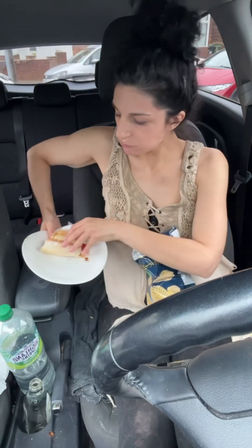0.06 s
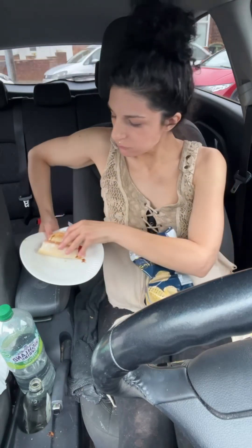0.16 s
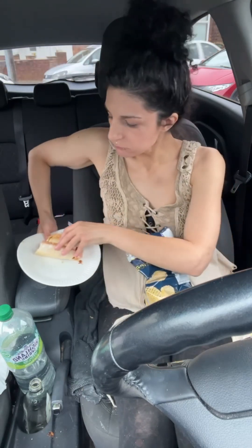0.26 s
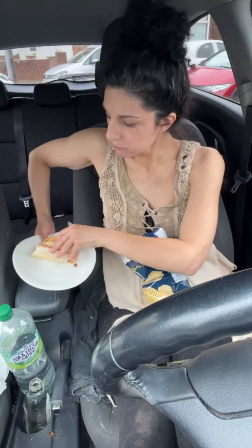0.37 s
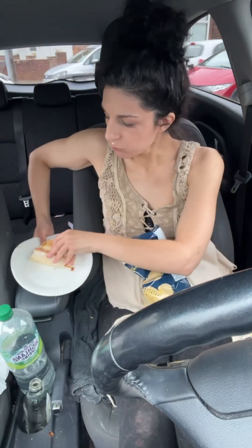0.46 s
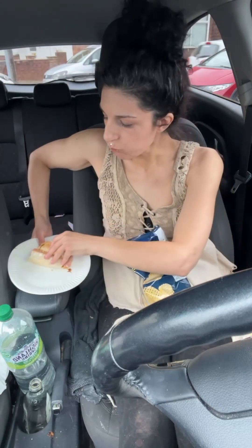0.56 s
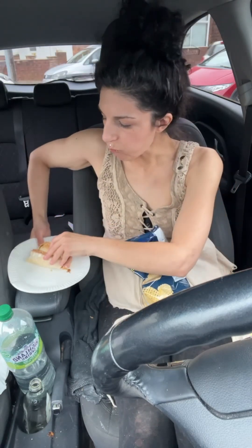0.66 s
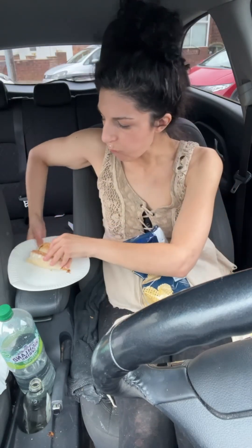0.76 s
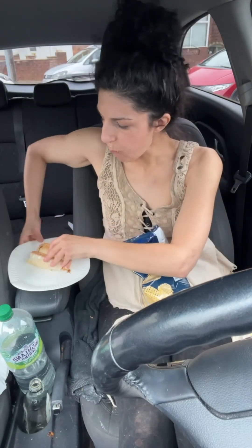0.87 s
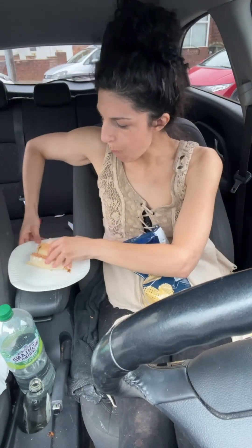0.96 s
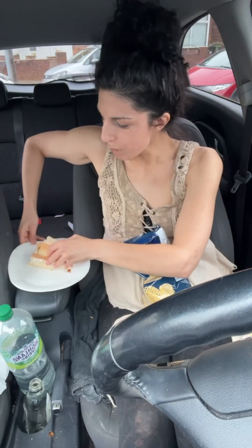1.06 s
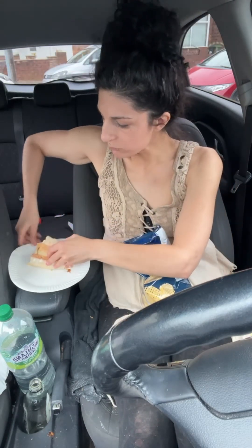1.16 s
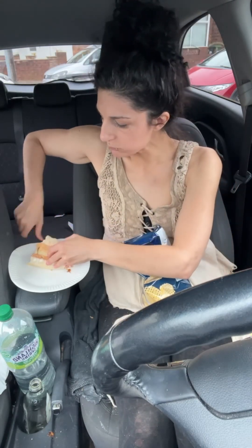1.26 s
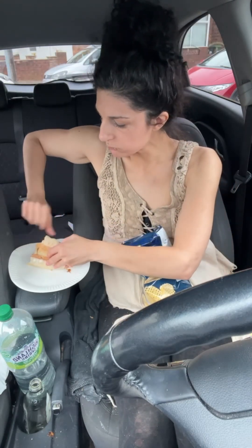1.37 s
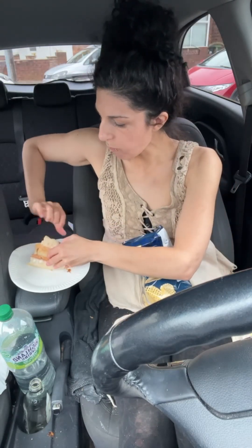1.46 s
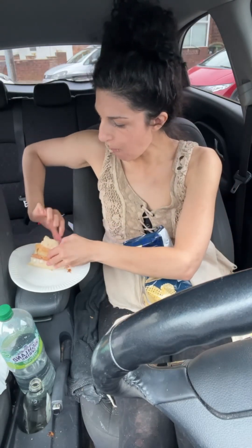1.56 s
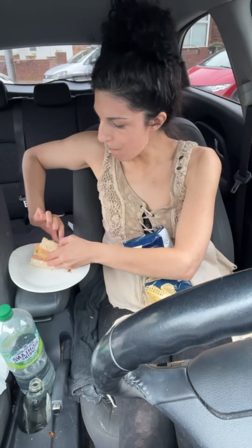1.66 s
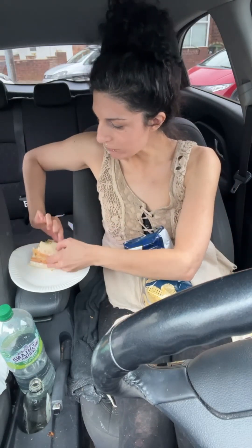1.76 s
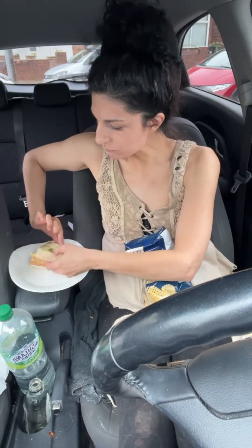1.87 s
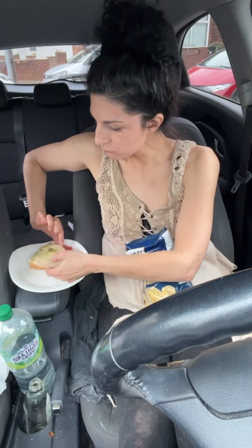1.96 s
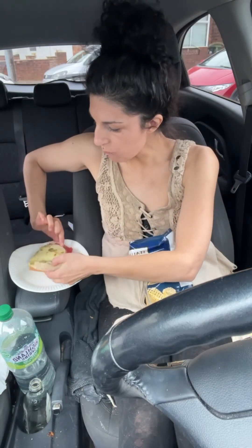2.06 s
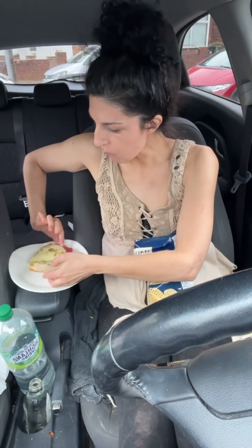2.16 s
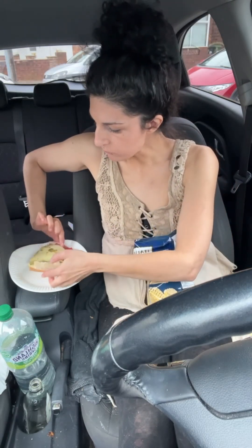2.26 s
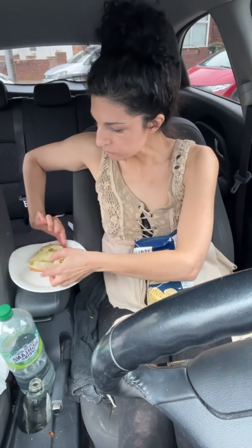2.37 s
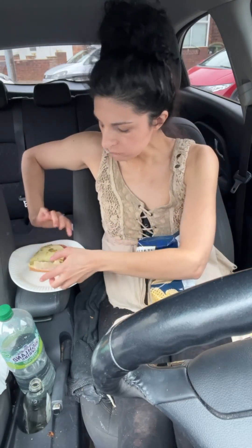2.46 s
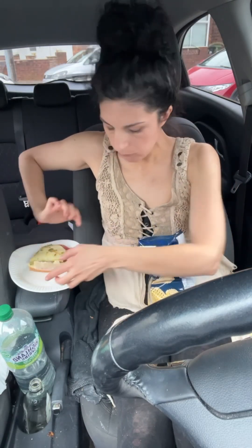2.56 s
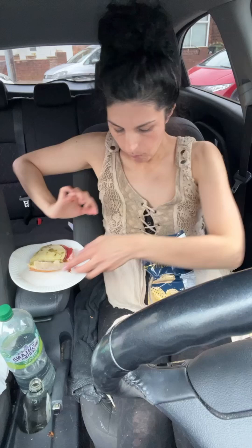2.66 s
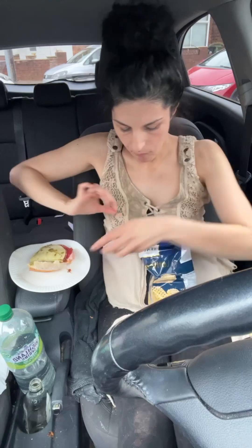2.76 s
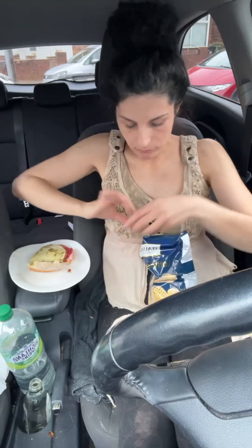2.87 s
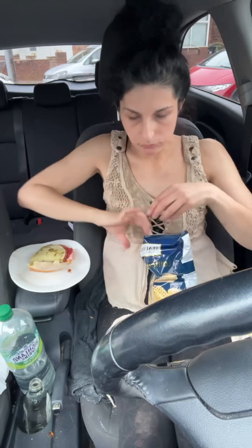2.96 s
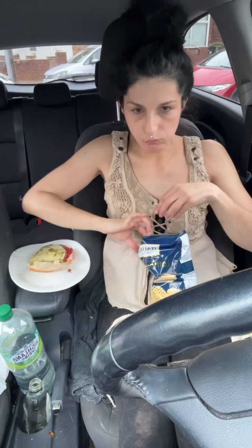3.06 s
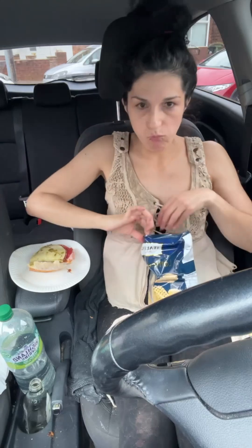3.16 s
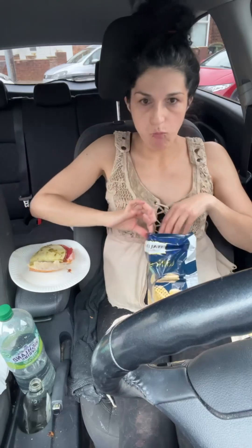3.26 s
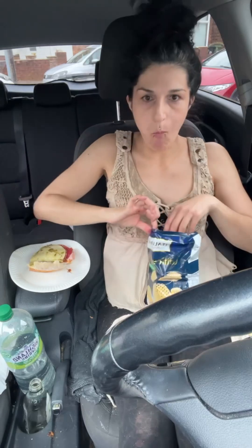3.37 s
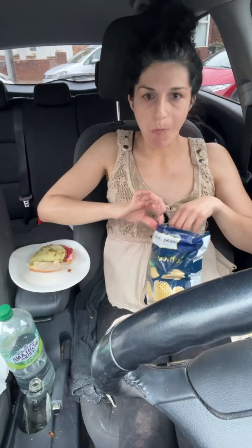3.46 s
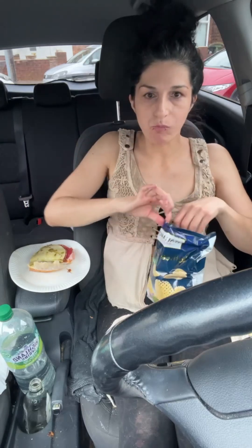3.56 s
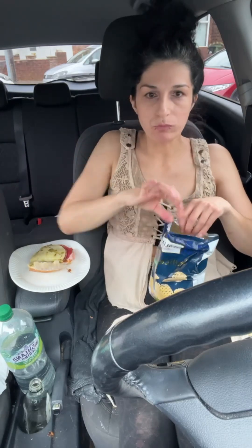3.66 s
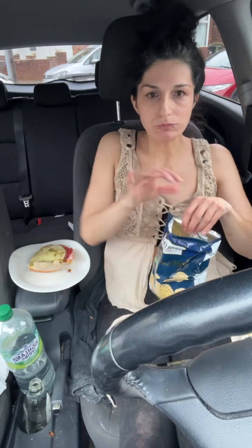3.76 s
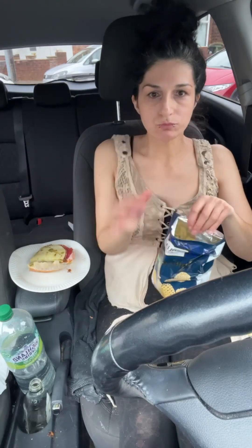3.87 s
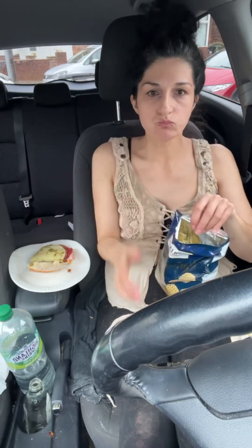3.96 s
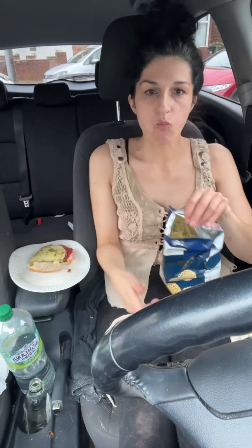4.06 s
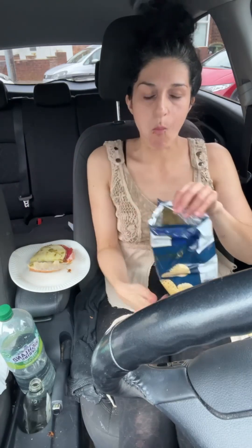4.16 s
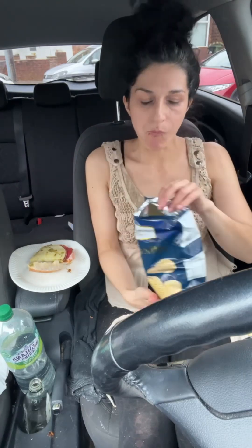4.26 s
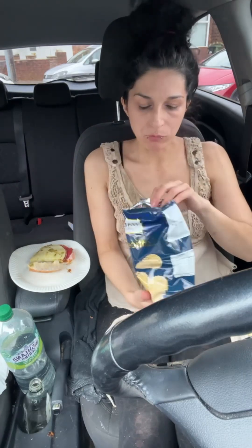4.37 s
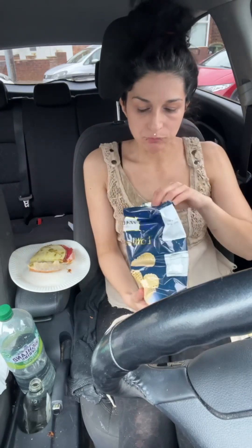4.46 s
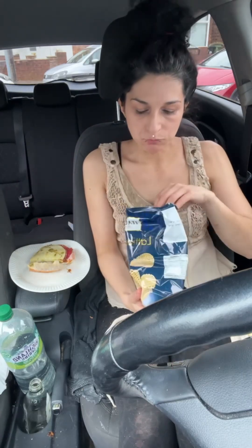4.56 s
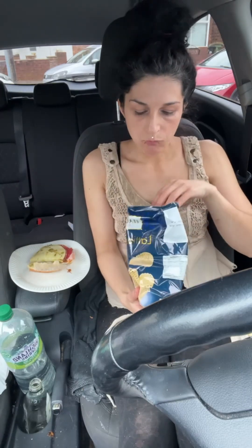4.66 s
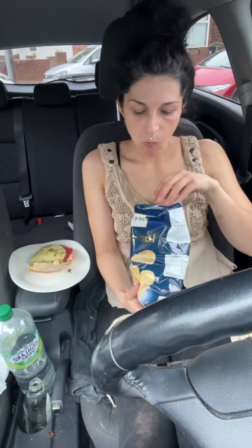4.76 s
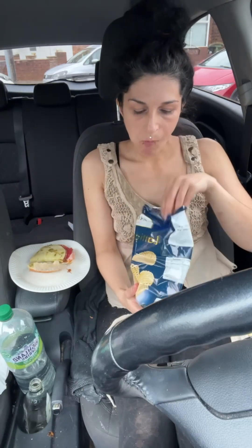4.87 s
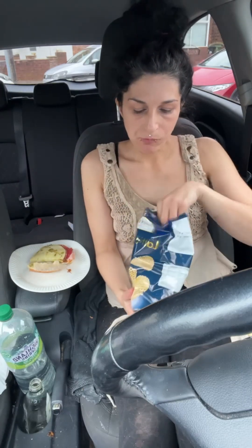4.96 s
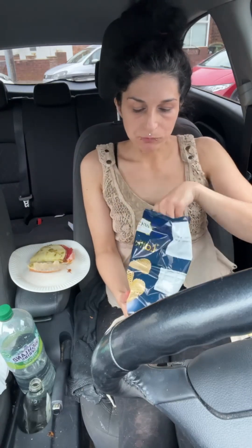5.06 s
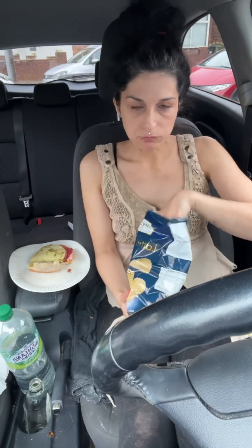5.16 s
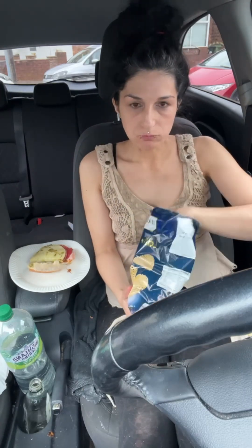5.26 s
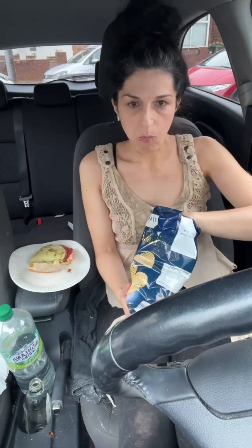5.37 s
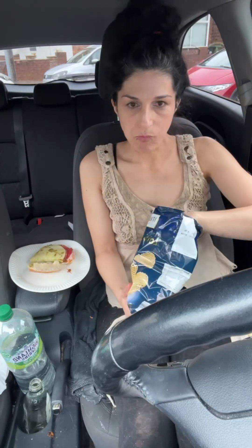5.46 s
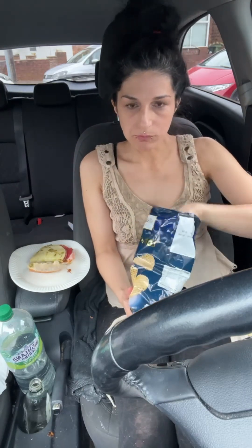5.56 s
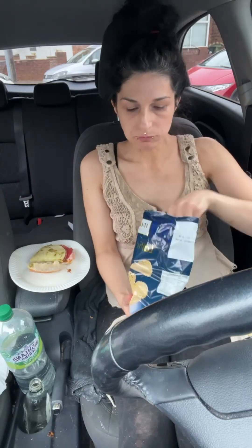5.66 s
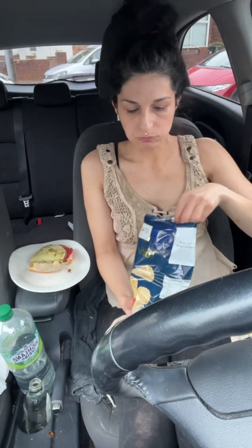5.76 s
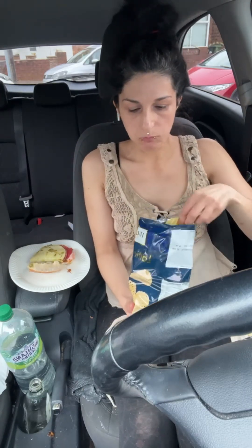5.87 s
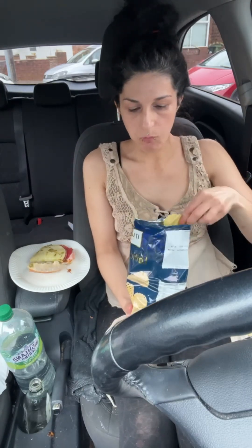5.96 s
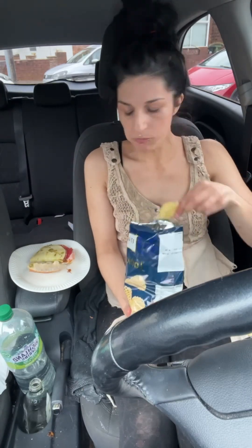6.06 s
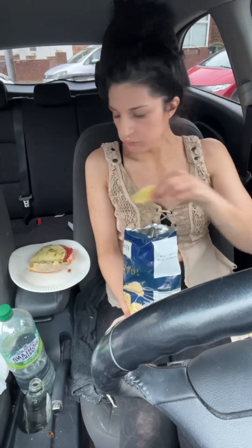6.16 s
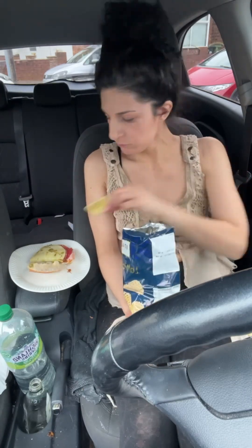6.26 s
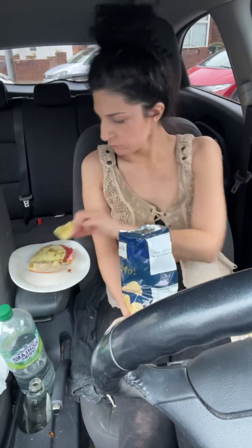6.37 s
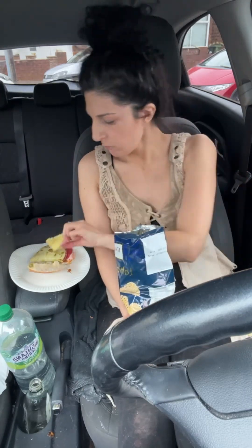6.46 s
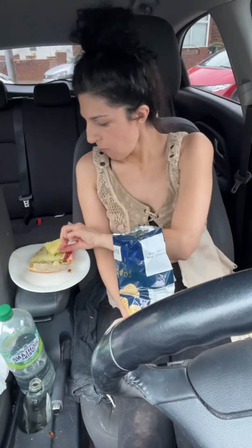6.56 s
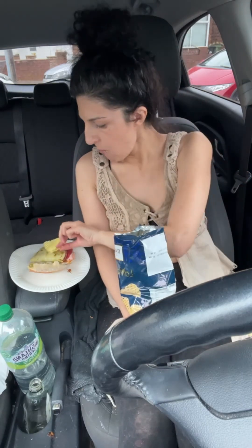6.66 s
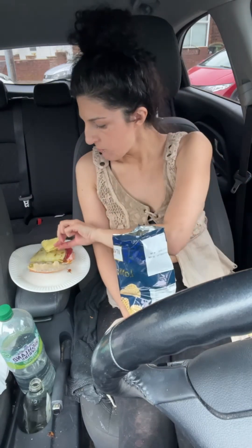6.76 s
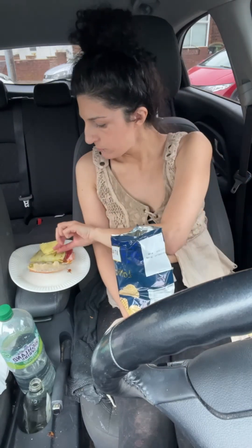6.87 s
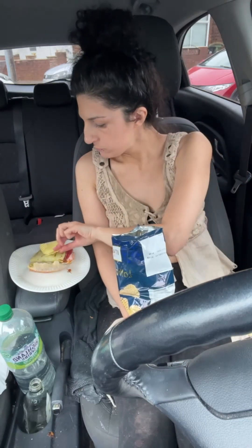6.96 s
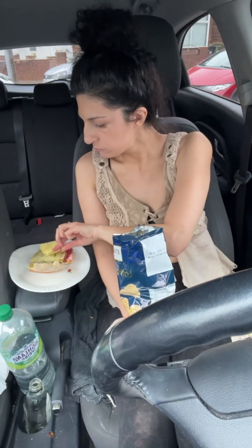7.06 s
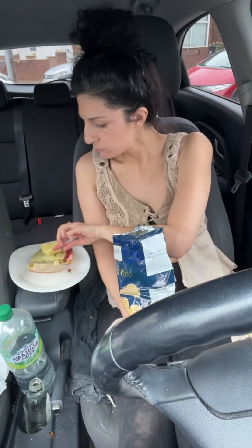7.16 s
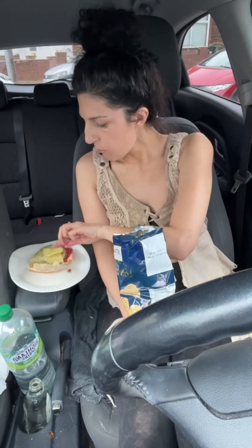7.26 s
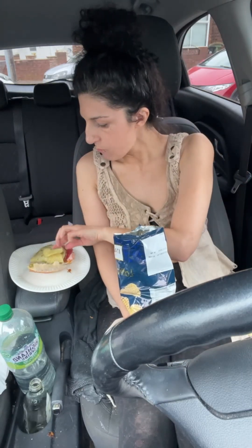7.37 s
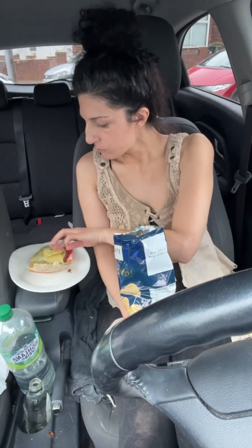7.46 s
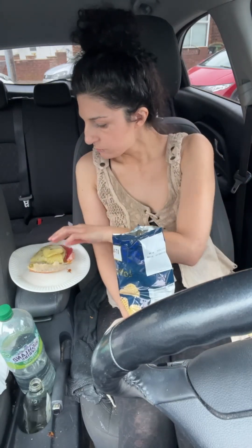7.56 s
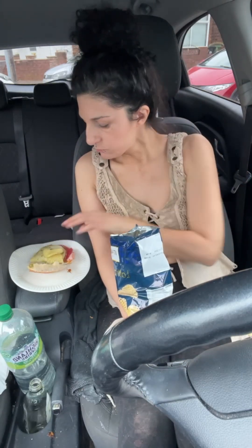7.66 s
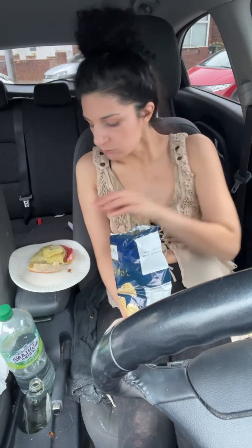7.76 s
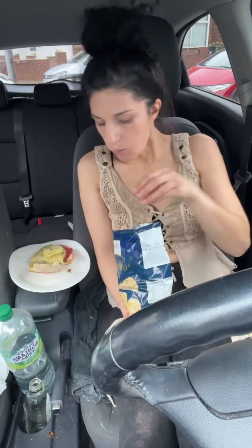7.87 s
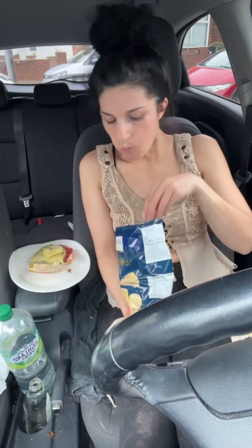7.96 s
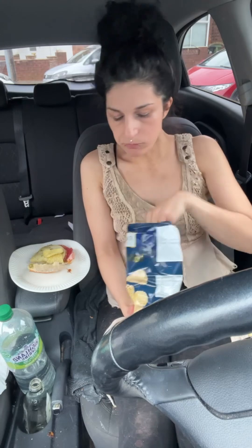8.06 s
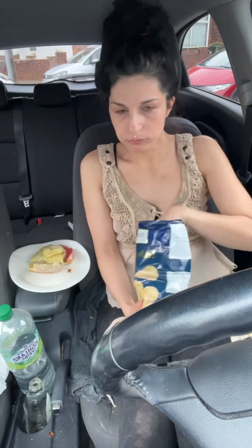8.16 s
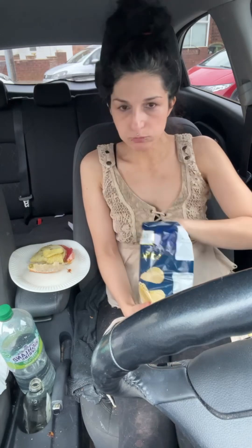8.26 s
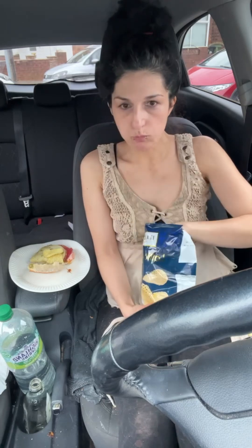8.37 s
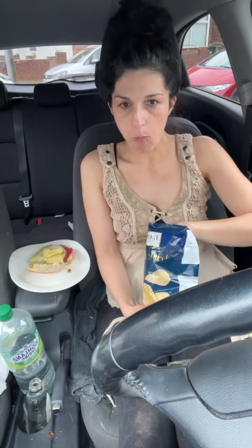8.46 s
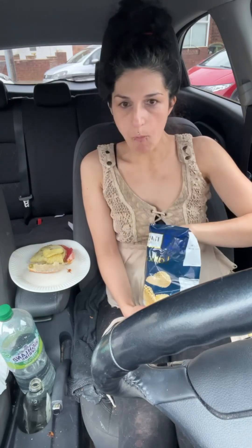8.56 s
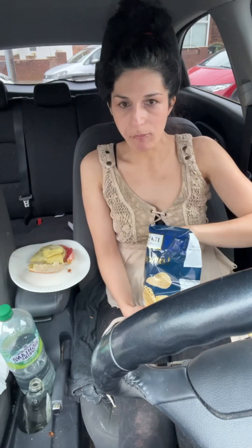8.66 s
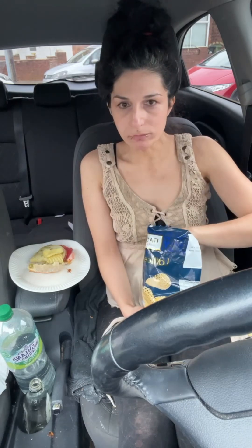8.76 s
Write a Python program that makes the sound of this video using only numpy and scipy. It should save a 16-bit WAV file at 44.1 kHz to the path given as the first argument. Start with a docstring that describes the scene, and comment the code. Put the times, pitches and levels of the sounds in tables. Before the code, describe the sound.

Inside a closed parked car, a thin foil snack packet is touched lightly: a few crisp snaps and skin sliding on film over low traffic rumble. After a short lull, dense crackling, sharp snaps and soft thuds build, loudest past five seconds, then thin out. Faint ticks follow, almost quiet, before a final brisk crackle. Close phone microphone, dry cabin with very short echoes.

```python
"""A hand works a thin foil snack packet inside a parked car, with far traffic rumbling and fading low down.
First come a few clear snaps of creases, then skin sliding over the film, more snaps and a short lull.
From about 3.2 s dense crackle, snaps and soft thuds build up, strongest after 5 s, and thin out past 6 s.
A few faint ticks follow, then a last lively burst from about 8.1 s. Filtered noise makes the rustle and the
traffic, ringing tones make the knocks, and the bag puffs low air; the small padded cabin adds short echoes."""
import sys
import numpy as np
from scipy import signal
from scipy.io import wavfile
from scipy.ndimage import uniform_filter1d

SR = 44100
rng = np.random.default_rng(int(sys.argv[2]) if len(sys.argv) > 2 else 0)


def waveform_to_disk(signal):
    """Save audio, clipped to [-1, 1], as 16-bit WAV at the path in sys.argv[1]."""
    frames = np.transpose(np.atleast_2d(signal))
    scaled = np.clip(frames, -1, 1) * 32767
    samples = np.round(scaled).astype(np.int16)
    wavfile.write(sys.argv[1], SR, samples)


def magnitude_from_level(level_db):
    """Linear magnitude for a level in decibels (20 dB per decade)."""
    exponent = np.asarray(level_db, float) / 20
    return 10 ** exponent


N = 389403

# hiss of the still air in the closed car: pitch_hz, density_db (per Hz, shape only)
STILL_AIR = [(180, -25), (300, -7), (433, -5), (4230, -13), (14500, -31), (16000, -45)]
STILL_AIR_DB = -68
# colour of the wash from the street: pitch_hz, density_db (per Hz, shape only)
STREET_COLOUR = [(47, -44), (80, 2), (206, -3), (290, -6.5), (425, -17), (700, -21), (1100, -68.5)]
# the low sound of traffic over time: time_s, drone_db, wash_db
TRAFFIC = [(0, -49, -51.5), (.5, -51.5, -56), (.62, -49.5, -53), (1.2, -45.5, -60), (1.55, -49, -55),
           (1.65, -56.5, -56.5), (2.2, -51, -57.5), (2.5, -56.5, -58), (6, -63.5, -61.5),
           (8.83, -60.5, -65)]
# how fast echoes die in the cabin: pitch_hz, fall_by_60_db_s
CABIN_DECAY = [(300, 0.2), (800, 0.059), (2000, 0.071), (5500, 0.047), (14000, 0.073)]
# soft thuds of hand, bag and plate: start_s, peak_db, pitch_hz
SOFT_THUDS = [(0.137, -34.5, 415), (0.142, -36.5, 202), (0.633, -35.5, 150), (2.696, -40.5, 74),
              (3.253, -39, 327), (3.482, -32, 253), (3.63, -31.5, 292), (3.799, -39, 259),
              (5.104, -29, 104), (5.322, -38.5, 204), (5.439, -33.5, 102), (5.763, -32, 222),
              (8.466, -34, 243), (8.55, -32.5, 261.7)]
# the packet resting in lap or hand between strokes: time_s, rustle_db
RESTING_LEVEL = [(0, -65.5), (1.3, -69.5), (1.6, -79), (2.6, -71), (2.8, -86), (3.16, -94), (3.3, -52),
                 (4.3, -64), (5.25, -56), (6.15, -66), (6.25, -80), (6.45, -72), (6.95, -72), (7.2, -109.5),
                 (8.1, -79), (8.7, -51)]
# single strokes and squeezes of hand or arm on the film:
# start_s, length_s, rustle_db, change_db (from start to end)
HAND_STROKES = [(0.115, 0.18, -63.5, 4.5), (0.544, 0.1, -64.5, 10.5), (0.658, 0.052, -59.5, 1.5),
                (0.821, 0.21, -51.5, 10), (1.087, 0.2, -47.5, -5), (1.767, 0.094, -58.5, 6),
                (1.947, 0.35, -63, -1.5), (2.487, 0.087, -53, -1), (3.235, 0.04, -44, 4),
                (3.391, 0.029, -42.5, 2), (3.414, 0.24, -44, 0), (3.757, 0.031, -37.5, 5.5),
                (3.83, 0.039, -54.5, 6), (3.98, 0.19, -50.5, 7.5), (4.443, 0.015, -35, -9),
                (4.502, 0.14, -47, 4), (4.675, 0.39, -42, -11), (5.026, 0.18, -35, -5),
                (5.306, 0.084, -37, 12), (5.423, 0.25, -37, -12), (5.675, 0.11, -49, 11),
                (5.795, 0.19, -38, -8), (5.99, .17, -55, -3), (2.974, 0.027, -67, 0.5),
                (7.345, 0.012, -71.5, 10), (7.921, 0.12, -67, -2.5), (8.162, 0.26, -42.5, 1),
                (8.341, 0.025, -33.5, 4), (8.39, 0.084, -40.5, 0), (8.492, 0.074, -38.5, 0.5),
                (8.758, 0.13, -51, 0)]
RISE_DB_PER_S, FALL_DB_PER_S = 550, 449.5  # every stroke swells in and dies away alike
# manner of touch: time_s, slide_share (0 all crackle, 1 all smooth sliding), hollow_db (against the rustle)
TOUCH_MANNER = [(0, 0.08, 2), (.8, 0.6, -4.5), (1.3, 0.54, -19), (1.5, 0.43, -6), (2.55, 0.46, -7),
                (3.3, 0.09, -7), (5.9, 0.18, -7.5), (6.4, 0.21, 6.5), (8.05, 0.04, -8)]
# colour of sliding skin against crackle: pitch_hz, level_db
SKIN_COLOUR = [(1750, 0), (2170, -4.5), (2760, 11), (3270, -5), (3800, 0)]
# colour of the film's own sound: pitch_hz, density_db (per Hz, shape only)
FILM_COLOUR = [(760, -15), (1300, -4), (1940, -8.5), (2950, -3), (7000, 1.5), (9000, -0.5), (11200, -11.5),
               (15800, -14.5)]
# ringing modes of bag and dashboard: pitch_hz, width_hz, level_db
HOLLOW_MODES = [(615, 1700, -18), (780, 60, -16), (1000, 61, 12.5), (1120, 85, 6.5), (1433, 79, 0)]
# clear snaps of a crease: start_s, peak_db, pitch_hz (of the film patch), knock_db (hollow knock against the peak)
CREASE_SNAPS = [(0.0365, -25, 7360, -43), (0.1201, -28.5, 8700, -10), (0.1317, -28.5, 1940, -19),
                (0.628, -36.5, 2790, -3), (1.0171, -42, 1840, -37), (1.1287, -43.5, 2700, 4),
                (1.4053, -40.5, 2760, -0.5), (1.5144, -31, 3350, -9), (1.928, -24, 8400, -21),
                (2.029, -41.5, 8200, -25), (2.1695, -28.5, 2540, -18), (2.1878, -33.5, 1540, -11),
                (2.272, -40, 2500, -9), (2.614, -38, 7160, -10), (2.6471, -33.5, 2590, -10),
                (2.7286, -32, 2600, -5), (3.2411, -21.5, 5760, -21), (3.259, -19.5, 3120, -37),
                (3.3355, -13, 2350, -25), (3.3898, -32, 3830, -10), (3.4035, -24, 2600, -7.5),
                (3.4477, -30, 2840, -3), (3.4808, -16, 2740, -19), (3.5705, -31, 1710, -5),
                (3.594, -25, 2060, -8), (3.6272, -17.5, 3800, -17), (3.694, -23.5, 2920, -35),
                (3.7515, -38, 2760, -9), (3.7658, -26, 1830, -26), (3.906, -21, 1820, -23.5),
                (3.9526, -37, 4250, -7), (3.9935, -32.5, 2210, -3.5), (4.0335, -26.5, 1470, -16),
                (4.0539, -36, 3090, -15), (4.0725, -23.5, 2800, -30), (4.0921, -21, 6060, -22),
                (4.122, -22, 2370, -23), (4.1467, -33, 2850, -1), (4.163, -24.5, 5000, -28),
                (4.186, -23, 4500, -30), (4.2005, -20.5, 5000, -21), (4.2126, -22.5, 5400, -19),
                (4.2693, -19.5, 7350, -17.5), (4.2826, -18.5, 3500, -29), (4.338, -29, 4500, -20),
                (4.4309, -21.5, 2500, -17), (4.5182, -34, 1630, -10), (4.5523, -29, 5000, -20),
                (4.573, -23.5, 2880, -8.5), (4.593, -19, 9100, -20), (4.6537, -23.5, 2250, -14),
                (4.6795, -24, 4500, -17), (4.6976, -15, 3370, -23), (4.7253, -23, 7100, -26),
                (4.7547, -27, 3040, -10), (4.775, -24, 4100, -9), (4.8391, -34, 7500, -26),
                (4.9618, -22.5, 3200, -22), (4.9763, -24.5, 5800, -20), (5.025, -18.5, 8060, -7),
                (5.0634, -18, 5500, -50), (5.0988, -18, 1510, -10.5), (5.1133, -9.5, 2410, -9),
                (5.1804, -19.5, 1714, -30), (5.3134, -19.5, 3580, -14), (5.3483, -11, 5190, -20.5),
                (5.385, -15, 3870, -31.5), (5.4181, -23.5, 5700, -35.5), (5.4379, -5.5, 7220, -19.5),
                (5.4933, -20.5, 2650, -9.5), (5.5924, -18.5, 4300, -22), (5.6371, -27, 1770, -13),
                (5.702, -29, 7100, -28), (5.7535, -19, 2940, -29), (5.7703, -15.5, 3360, -14),
                (5.7855, -25.5, 3220, -18), (5.8125, -26.5, 7040, -29), (5.8812, -30, 6000, -9),
                (6.0223, -31.5, 3000, -5), (6.1117, -41.5, 7520, -6.5), (6.2014, -32.5, 2770, -9.5),
                (6.3049, -41, 1790, 5.5), (6.8658, -40.5, 2040, 0), (6.9127, -38, 3870, -10),
                (7.0431, -40, 2900, -39), (7.3922, -38.5, 4000, -19), (7.5754, -45, 2870, -14),
                (8.1344, -37, 1680, 3.5), (8.1553, -25.5, 4200, -28), (8.177, -28.5, 5160, -21),
                (8.209, -24, 3660, -7), (8.236, -33, 5000, -20), (8.2667, -23, 4600, -17),
                (8.3372, -15.5, 7900, -10), (8.3439, -11, 4000, -19), (8.3579, -17.5, 3030, -31),
                (8.3917, -23, 7530, -18), (8.402, -18.5, 3060, -9.5), (8.4271, -26, 3830, -8),
                (8.457, -18, 2600, -26), (8.4693, -12.5, 7300, -9), (8.6324, -28, 2600, -8),
                (8.7239, -28.5, 3850, -9), (8.7564, -20.5, 5200, -17)]


def evened(x):
    """Scales a sound to an average (rms) level of 1."""
    return x / np.sqrt(np.mean(x ** 2) + 1e-20)


def read(points, hz):
    """Reads a table over pitch, with pitch on a log scale."""
    f, value = np.transpose(points)
    return np.interp(np.log(hz + 1), np.log(f + 1), value)


def curve(rows):
    """Turns the columns of a time table into one value per sample."""
    s, *columns = np.transpose(rows)
    return [np.interp(np.arange(N) / SR, s, c) for c in columns]


def colour(points):
    """A filter with the given spectrum that answers at once, with no sound ahead of its cause."""
    hz = abs(np.fft.fftfreq(4096, 1 / SR))
    log_gain = np.log(magnitude_from_level(np.maximum(read(points, hz), -100)))
    phase = -signal.hilbert(log_gain).imag  # minimum phase
    return np.fft.ifft(np.exp(log_gain + 1j * phase)).real[:2048]


def hiss(points):
    """Steady noise with the given spectrum."""
    return evened(signal.oaconvolve(rng.standard_normal(N), colour(points))[:N])


def ring(hz, width, size):
    """A struck body rings at one pitch and fades; a wider resonance (Hz) fades sooner."""
    t = np.arange(size) / SR
    return np.exp(-np.pi * width * t) * np.sin(2 * np.pi * hz * t)


def still_air():
    """A steady faint hiss stands for the still air of the closed car."""
    return magnitude_from_level(STILL_AIR_DB) * hiss(STILL_AIR)


def traffic(drone_hz=56, width_hz=16):
    """Noise shaking the cabin's lowest mode gives a fuzzy drone, over a wash from the street."""
    drone_db, wash_db = curve(TRAFFIC)
    narrow = ring(drone_hz, width_hz, size=8192)
    wide = ring(drone_hz, 3 * width_hz, size=8192)
    mode = np.diff(signal.fftconvolve(narrow, wide))
    drone = evened(signal.oaconvolve(rng.standard_normal(N), mode)[:N])
    return magnitude_from_level(drone_db) * drone + magnitude_from_level(wash_db) * hiss(STREET_COLOUR)


def cabin_paths(count, echo_db=3.02, gap_s=0.00065):
    """Direct sound, then dense echoes from glass and seats; each spot on the bag has its own path."""
    echoes = rng.choice([-1., 1.], (count, 6144)) * (rng.random((count, 6144)) < .15)
    hz, t, z = signal.stft(echoes, SR, nperseg=128)
    fade_db = -60 * t / read(CABIN_DECAY, hz)[:, None]
    paths = signal.istft(z * magnitude_from_level(fade_db), SR, nperseg=128)[1]
    paths[:, :round(gap_s * SR)] = 0
    paths *= magnitude_from_level(echo_db) / np.linalg.norm(paths, axis=1)[:, None]  # all echoes against the direct sound
    paths[:, 0] = 1
    return paths


def effort_db():
    """How hard the packet is worked: the strongest of the strokes, or the resting level."""
    t, level_db = np.arange(N) / SR, curve(RESTING_LEVEL)[0]
    for s, length, db, change_db in HAND_STROKES:
        hold_db = db + change_db * np.clip((t - s) / length, 0, 1)
        before_s = np.maximum(s - t, 0)
        after_s = np.maximum(t - s - length, 0)
        stroke_db = hold_db - (RISE_DB_PER_S * before_s + FALL_DB_PER_S * after_s)
        level_db = np.maximum(level_db, stroke_db)
    return level_db


def puffs(puff_db=-10, puff_hz=150):
    """The squeezed bag puffs low air: broad low noise that follows the strength of the rustle."""
    breath = np.diff(ring(puff_hz, puff_hz, size=2048))
    air = evened(signal.oaconvolve(rng.standard_normal(N), breath)[:N])
    return magnitude_from_level(effort_db() + puff_db) * air


def thuds(cycles=4.6, rise_s=0.0022):
    """A soft blow: a slow push that rings a few low cycles."""
    out = np.zeros(N + SR)
    rise = 1 - np.exp(-np.arange(8192) / SR / rise_s)
    for s, peak_db, hz in SOFT_THUDS:
        sound = rise * ring(hz, hz / cycles, size=8192)
        out[round(s * SR):][:8192] += magnitude_from_level(peak_db) * sound / abs(sound).max()
    return out[:N]


def patch(hz, sharp, flat):
    """A small patch of film: a few cycles at its own pitch over a wide tick of strength flat."""
    tick = ring(hz, hz / sharp, size=256) / sharp  # a higher sharp rings longer
    tick[0] = flat
    return signal.fftconvolve(tick, colour(FILM_COLOUR)[:512])


def hollow_ring():
    """The enclosed air answers every knock with the same modes, with signs taking turns."""
    out = np.zeros(3000)
    for k, (hz, width, db) in enumerate(HOLLOW_MODES):
        out += (-1) ** k * magnitude_from_level(db) * ring(hz, width, size=3000)
    return out


def crackle_ticks(level_db, ticks_per_s=300, spread_db=5.5, clump_db=4, crowding=.6, usual_db=-48, light_db=10):
    """Small creases give way at random and in clumps; ticks_per_s is the base rate at the usual effort."""
    slow = uniform_filter1d(uniform_filter1d(rng.standard_normal(N), 500), 500)
    clumps = magnitude_from_level(clump_db * evened(slow))
    size = magnitude_from_level(spread_db * np.minimum(rng.exponential(1, N), 3)) * rng.choice([-1, 1], N)
    # harder work sets off more creases, light touches only a few
    crowd = magnitude_from_level(crowding * np.maximum(level_db - usual_db, -light_db))
    happens = rng.random(N) < crowd * clumps * ticks_per_s / SR
    return evened(size * happens / np.sqrt(crowd))


def rustle(paths):
    """Ticks on many film patches blend with the hiss of sliding skin, and both stir the hollow bag."""
    level_db, (slide, hollow_db) = effort_db(), curve(TOUCH_MANNER)
    slide = np.clip(slide, 0, 1)
    drive = np.sqrt(1 - slide) * crackle_ticks(level_db) + np.sqrt(slide) * hiss(SKIN_COLOUR)
    spot = rng.integers(0, len(paths), N)  # the patch that sounds at each sample
    bright, knock = np.zeros(N), np.zeros(N)
    hollow = np.pad(hollow_ring(), (0, paths.shape[1] - 3000))
    pitches = np.geomspace(1800, 9500, len(paths))
    for k, (path, hz) in enumerate(zip(paths, pitches)):
        part = magnitude_from_level(level_db) * drive * (spot == k)
        film = patch(hz, sharp=1.3, flat=0.73)
        film_answer = evened(signal.fftconvolve(path, film))
        bright += signal.oaconvolve(part, film_answer)[:N]
        hollow_answer = evened(signal.fftconvolve(path[:200], hollow))  # only the first echoes drive the modes
        knock += signal.oaconvolve(magnitude_from_level(hollow_db) * part, hollow_answer)[:N]
    return (bright + knock) / np.sqrt(paths.shape[1])


def snaps(paths, tear_s=0.0038, early_s=0.012, first=0.45, later=0.49, small_hz=3500):
    """Each crease gives way in one tick and a short run of smaller ones; low patches tick more dully."""
    out, t = np.zeros(N + SR), np.arange(1500) / SR
    shape = (len(CREASE_SNAPS), 1500)
    runs = rng.standard_normal(shape) * (rng.random(shape) < .1)
    runs *= later * np.exp(-t / tear_s)
    runs[:, 0] = first
    taut = 2 ** rng.uniform(-0.83, 1, len(CREASE_SNAPS))  # taut patches ring longer than slack ones
    hollow = hollow_ring()
    for k, (s, peak_db, hz, knock_db) in enumerate(CREASE_SNAPS):
        heard = signal.fftconvolve(runs[k], paths[k % len(paths)])
        film = patch(hz, sharp=0.76 * taut[k], flat=min(hz / small_hz, 1))
        bright = signal.fftconvolve(heard, film)[:len(heard)]
        early = heard * np.exp(-np.arange(len(heard)) / SR / early_s)  # the first echoes drive the modes
        knock = signal.fftconvolve(early, hollow)[:len(heard)]
        sound = bright / abs(bright).max() + magnitude_from_level(knock_db) * knock / abs(knock).max()
        out[round(s * SR):][:len(sound)] += magnitude_from_level(peak_db) * sound
    return out[:N]


def scene():
    """Still air and traffic behind, then the puffs, thuds, rustle and snaps of the packet, as one channel."""
    paths = cabin_paths(count=12)
    background = still_air() + traffic()
    packet = puffs() + thuds() + rustle(paths) + snaps(paths)
    return (background + packet)[None]


def low_pass(x):
    """Removes everything above the highest recorded frequency."""
    return signal.sosfilt(signal.butter(12, 16960, fs=SR, output="sos"), x)


def record(dry, bass_hz=38, edge_hz=15850):
    """A phone cuts the deepest bass and the treble above its band limit."""
    bass_cut = signal.butter(2, bass_hz, "high", fs=SR, output="sos")
    band_limit = signal.firwin(255, edge_hz, window=("kaiser", 3), fs=SR)
    mix = signal.oaconvolve(signal.sosfilt(bass_cut, dry), band_limit[None], "same")
    return low_pass(mix)


dry = scene()
out = record(dry)
waveform_to_disk(out)
```